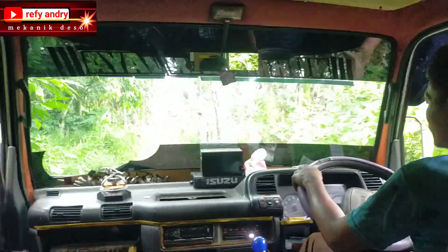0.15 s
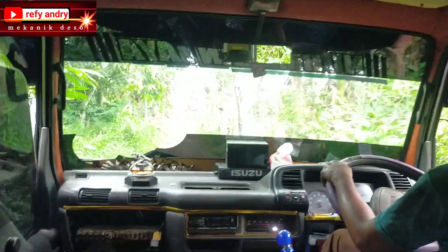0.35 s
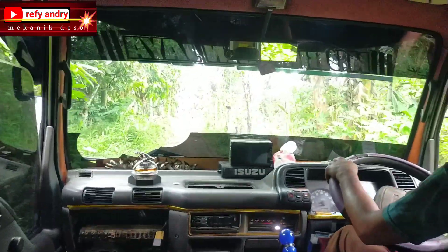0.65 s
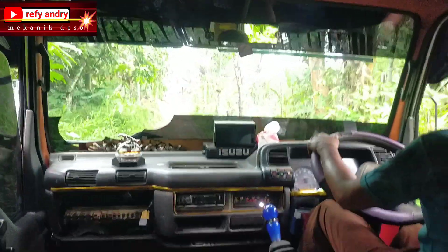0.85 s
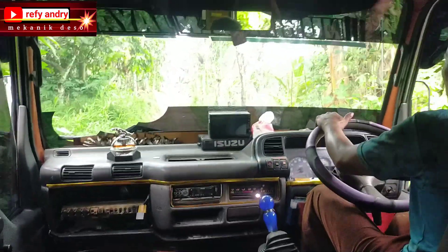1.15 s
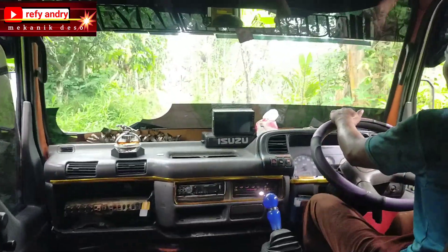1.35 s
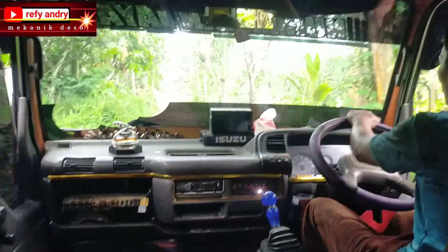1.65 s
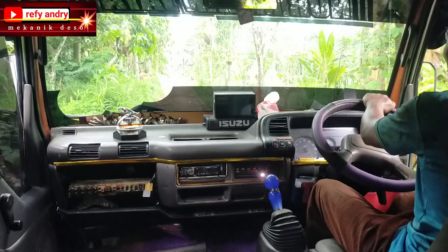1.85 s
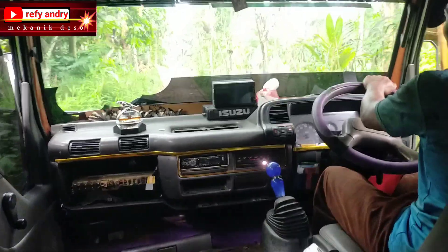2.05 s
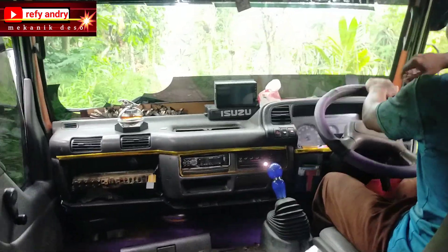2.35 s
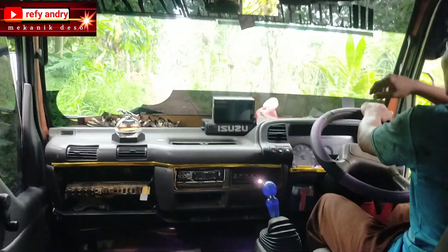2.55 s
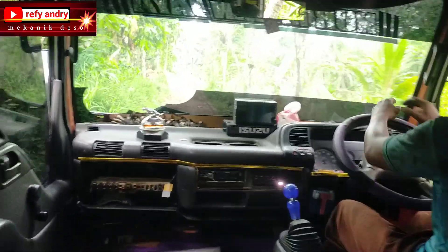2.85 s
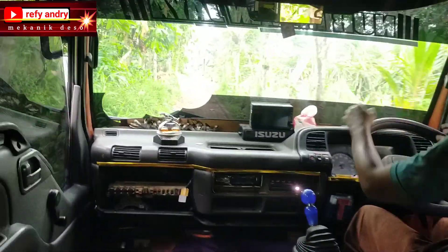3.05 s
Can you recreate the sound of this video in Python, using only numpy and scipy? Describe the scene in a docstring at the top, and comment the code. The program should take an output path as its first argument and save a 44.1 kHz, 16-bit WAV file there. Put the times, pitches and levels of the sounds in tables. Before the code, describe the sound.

Truck diesel engine pulls steadily harder inside the cab while a turbo whine climbs.

```python
"""Inside the cab of a truck, one microphone hears a four-cylinder turbo-diesel pull at low revs.
Each firing strikes the block and gates its clatter, filtered by resonances of block and cab, and
multiples of the firing rate boom in the cab. The turbocharger whines in four harmonics, modulated by
turbulent air, with a breathy band near the second. Coloured noise is the rush of the intake."""
import sys
import numpy as np
from scipy import signal
from scipy.io import wavfile
from scipy.ndimage import uniform_filter1d

SR = 44100
rng = np.random.default_rng(int(sys.argv[2]) if len(sys.argv) > 2 else 0)


def nominal_scale(level):
    """Amplitude ratio for a level in decibels (scalar or array-like)."""
    x = np.asarray(level, float) / 20
    return 10 ** x


def generate_wav(signal):
    """Clip the signal to [-1, 1] and save it as 16-bit WAV at the path in sys.argv[1]."""
    frames = np.transpose(np.atleast_2d(signal))
    scaled = np.clip(frames, -1, 1) * 32767
    pcm = np.round(scaled).astype(np.int16)
    wavfile.write(sys.argv[1], SR, pcm)


N = 141120  # samples


def unit(x):
    """Normalization: scale to an rms of 1."""
    return x / np.sqrt(np.mean(np.abs(x) ** 2) + 1e-20)


def curve(rows):
    """Linear interpolation: the columns of a time table, one value a sample."""
    s, *columns = np.transpose(rows)
    return [np.interp(np.arange(N) / SR, s, c) for c in columns]


def at(points, hz):
    """Spectral envelope: read a level on a log-frequency axis."""
    table_hz, table_db = np.transpose(points)
    return np.interp(np.log(hz), np.log(table_hz), table_db)


def wander(rate_hz):
    """Random modulation: noise through a double one-pole low-pass, run in, with an rms of 1."""
    r = np.exp(-2 * np.pi * rate_hz / SR)
    run_in = SR // 2
    noise = rng.standard_normal(N + run_in)
    return unit(signal.lfilter([1], [1, -2 * r, r * r], noise)[run_in:])


def bands(sources, low, count, per_octave):
    """Filter bank: yield centre and signal of each band; neighbours take different sources."""
    edges = low * 2 ** (np.arange(count + 1) / per_octave)
    for k in range(count):
        sos = signal.butter(2, edges[k:k + 2], "band", fs=SR, output="sos")
        yield np.sqrt(edges[k] * edges[k + 1]), signal.sosfilt(sos, sources[k % 2])


def lifted(x, hz, width_hz, db):
    """Resonance: a two-pole mode added to x raises its centre by db (a negative db cuts it)."""
    r = np.exp(-np.pi * width_hz / SR)
    zeros = np.array([1, 0, -1]) * (1 - r * r) / 2
    poles = [1, -2 * r * np.cos(2 * np.pi * hz / SR), r * r]
    return x + (nominal_scale(db) - 1) * signal.lfilter(zeros, poles, x)


# engine speed: (time [s], firing rate [1/s])
FIRING_RATE = [(0, 34.2), (.33, 36.9), (.46, 37.7), (.75, 36.4), (1.05, 37.4), (1.32, 37.1), (1.62, 39.3),
               (1.97, 38.5), (2.35, 40), (2.7, 41.2), (3.0, 42), (3.2, 42.5)]


def firing():
    """Periodicity: the firing rate, and its integral, the count of firings so far."""
    rate, = curve(FIRING_RATE)
    return rate, np.cumsum(rate) / SR


# strength of the knock of each cylinder in firing order: (level [dB])
CYLINDER_KNOCK = [0.13, -1.7, 0.75, -1.3]


def knock_train():
    """Impulsive excitation: one impulse a firing, uneven between cylinders and from stroke to stroke."""
    spread_db, jitter_s = 0.7, 0.000092  # standard deviations
    _, count = firing()
    fired = np.flatnonzero(np.diff(np.floor(count), prepend=-1))
    chance = rng.standard_normal((len(fired), 2))
    at_sample = np.clip(fired + chance[:, 0] * jitter_s * SR, 0, N - 1).astype(int)
    knocks = np.zeros(N)
    knocks[at_sample] = nominal_scale(np.resize(CYLINDER_KNOCK, len(fired)) + spread_db * chance[:, 1])
    return knocks


# broad colour of block and cab: (frequency [Hz], relative level [dB])
CLATTER_COLOUR = [(22, -19), (50, -17.5), (115, -16.5), (250, -13), (340, -7.5), (640, -9.5), (1200, -4.5),
                  (2020, -6), (2400, -12.5), (3150, -10), (6000, -15)]
# resonances of block and panels: (frequency [Hz], width [Hz], lift [dB])
BODY_MODES = [(350, 27, 1), (516, 33, 4), (567.4, 16.5, 6.5), (689, 17, 5.5), (763, 34, 5), (913, 74, 3),
              (1235, 67, 5.5), (1330, 33, -5.5), (1470, 34, 3.5), (1981, 43, 8), (2061, 26, 6.5),
              (2141, 25, 5), (2440, 67, 5.5), (2604, 20, 11.5)]
# load, as the level of the clatter: (time [s], rms level [dB])
LOAD_LEVEL = [(0.0, -30), (0.54, -28.5), (0.93, -30.5), (1.01, -28.5), (2.09, -28.5), (2.29, -28),
              (3.19, -27)]


def clatter():
    """Source and filter: knocks and gated noise excite the colour and resonances of block and cab."""
    knock_db = -2.5  # rms, against noise of rms 1
    gate_depth, gate_decay_s = 0.52, 0.0055
    gated_above_hz = 750  # lower down the cab smears the bursts into a rumble
    knocks = knock_train()
    r = np.exp(-1 / (gate_decay_s * SR))
    gate = unit(signal.lfilter([1], [1, -2 * r, r * r], knocks))

    noise = rng.standard_normal((2, N))
    bursts = noise * (1 - gate_depth + gate_depth * gate) - nominal_scale(knock_db) * unit(knocks)
    low_pass = signal.butter(2, gated_above_hz, fs=SR, output="sos")
    high_pass = signal.butter(2, gated_above_hz, "high", fs=SR, output="sos")
    rumble = signal.sosfilt(low_pass, noise)
    rattle = signal.sosfilt(high_pass, bursts)
    drive = rumble - rattle  # opposite signs avoid a notch at the crossover

    out = sum(nominal_scale(at(CLATTER_COLOUR, hz)) * band
              for hz, band in bands(drive, 20, count=21, per_octave=2.5))
    for hz, width_hz, db in BODY_MODES:
        out = lifted(out, hz, width_hz, db)
    load_db, = curve(LOAD_LEVEL)
    return nominal_scale(load_db) * unit(out)


# response of the cab to a multiple at its pitch, before waver and fade: (frequency [Hz], rms level [dB])
CAB_BOOM = [(34, -70), (36.5, -49), (42, -51), (68, -49), (75, -54.5), (79, -62), (84, -104), (138, -54.5),
            (150, -60.5), (168, -51.5), (185, -61), (210, -59.5), (250, -53), (295, -69), (340, -49.5),
            (380, -84), (480, -68), (508, -46), (545, -55.5), (585, -44.5), (605, -45), (625, -46.5),
            (660, -62), (695, -49), (725, -43)]
# multiples of the firing rate that are heard: (order)
ORDERS_HEARD = [1, 2, 4, 5, 6, 7, 9, 13, 15, 17]


def boom():
    """Engine orders: sines at multiples of the firing rate take the cab's response at their pitch."""
    waver_db, waver_hz = 2.5, 4
    hum_from_order, hum_full_rate, hum_db_per_rate = 13, 38.5, 4.0  # high orders fade below this rate
    hum_waver_db, hum_waver_hz = 1.8, 10  # and they come broken
    rate, count = firing()
    hum_fade_db = hum_db_per_rate * np.minimum(rate - hum_full_rate, 0)
    out = 0
    for k in ORDERS_HEARD:
        level_db = at(CAB_BOOM, k * rate) + waver_db * wander(waver_hz)
        if k >= hum_from_order:
            level_db = level_db + hum_fade_db + hum_waver_db * wander(hum_waver_hz)
        sine = np.sin(2 * np.pi * (k * count + rng.random()))
        out = out + np.sqrt(2) * nominal_scale(level_db) * sine
    return out


# pitch of the turbocharger whine: (time [s], frequency [Hz])
WHINE_PITCH = [(0.0, 3108), (0.2, 3162), (0.4, 3265), (0.5, 3318), (0.6, 3354), (0.8, 3385), (1.0, 3426),
               (1.2, 3464), (1.4, 3498), (1.6, 3575), (1.8, 3642), (2.0, 3672), (2.2, 3714), (2.4, 3787),
               (2.6, 3847), (2.8, 3926), (3.0, 4007), (3.2, 4102)]
# each harmonic swells and fades as it sweeps: (time [s], rms level before modulation [dB])
FIRST_SWELL = [(0.03, -23.5), (0.15, -22.5), (0.18, -36), (0.24, -27), (0.3, -35), (0.35, -28), (.42, -37),
               (0.46, -52), (0.65, -53), (0.7, -39), (0.8, -37), (0.87, -42), (0.92, -55), (1.0, -48),
               (1.04, -38), (1.13, -29.5), (1.19, -31), (1.21, -44), (1.23, -33.5), (1.33, -41), (1.5, -45),
               (1.63, -36), (1.72, -39), (1.77, -30), (1.83, -30), (1.86, -46), (1.93, -23), (1.97, -27),
               (2.04, -26), (2.2, -36), (2.29, -36), (2.32, -50), (2.5, -37), (2.55, -54), (2.78, -37),
               (2.96, -50), (3.0, -34), (3.08, -42)]
SECOND_SWELL = [(0.06, -36.5), (0.18, -28.5), (0.24, -27.5), (0.28, -42), (0.36, -30), (0.44, -42),
                (0.56, -37), (0.639, -37), (0.84, -51), (0.919, -31.5), (1.08, -47), (1.32, -38),
                (1.42, -36), (1.5, -51), (1.56, -31), (1.621, -39), (1.8, -43), (1.979, -33), (2.06, -34),
                (2.201, -20), (2.28, -19), (2.359, -19.5), (2.441, -30.5), (2.621, -24), (2.659, -24.5),
                (2.86, -15.5), (3.08, -20.5), (3.119, -30), (3.16, -26.5)]
THIRD_SWELL = [(1.18, -57), (1.36, -45), (1.52, -49), (1.68, -40), (1.82, -48), (2.05, -52), (2.3, -35),
               (2.5, -42), (2.6, -41), (2.7, -47), (2.98, -48), (3.08, -39), (3.16, -43)]
FOURTH_SWELL = [(0.06, -48), (0.36, -46), (0.62, -46), (0.76, -34), (0.92, -48), (1.02, -45), (1.1, -32),
                (1.22, -35), (1.32, -49), (1.4, -36), (1.52, -35), (1.58, -41), (1.62, -34), (1.7, -39),
                (1.76, -44), (1.86, -43), (2.05, -36), (2.12, -27), (2.24, -36), (2.32, -26), (2.38, -33),
                (2.42, -30), (2.5, -44), (2.56, -40), (2.8, -48)]
# turbulence on each harmonic, rms in each quadrature against the tone:
# (flutter share [1], flutter rate [Hz], fuzz level [dB], fuzz rate [Hz])
TURBULENCE = [(.14, 35, -18, 150), (.5, 50, -15, 200), (.6, 45, -11, 200), (.65, 60, -8, 300)]


def quadratures(rate_hz):
    """Complex modulation: independent wander in phase and in quadrature."""
    return wander(rate_hz) + 1j * wander(rate_hz)


def whine():
    """Harmonics and modulation: four tones on one shaft, with sidebands from firing and turbulence."""
    throb = 0.22  # share by which each firing pumps the whine
    wobble_hz, wobble_rate_hz = 3.06, 17.2
    halo_db, low_halo_db, halo_hz = -43.5, -41.5, 135  # rms; the low halo at full boost
    pitch, = curve(WHINE_PITCH)
    phase = 2 * np.pi * np.cumsum(pitch + wobble_hz * wander(wobble_rate_hz)) / SR
    _, count = firing()
    swells = [FIRST_SWELL, SECOND_SWELL, THIRD_SWELL, FOURTH_SWELL]
    out = 0
    for k, (swell, turbulence) in enumerate(zip(swells, TURBULENCE), 1):
        share, flutter_hz, fuzz_db, fuzz_hz = turbulence
        level_db, = curve(swell)
        pumping = throb * np.cos(2 * np.pi * count + k)
        flutter = share * quadratures(flutter_hz)
        fuzz = nominal_scale(fuzz_db) * quadratures(fuzz_hz)
        tone = np.real((1 + pumping + flutter + fuzz) * np.exp(1j * k * phase))
        out = out + np.sqrt(2) * nominal_scale(level_db) * tone

    # a steady blur of noise follows the second harmonic; the first gains its own as the boost builds
    halo = nominal_scale(halo_db) * np.real(quadratures(halo_hz) * np.exp(2j * phase))
    _, boost = curve(AIR_BOOST)
    low_halo = nominal_scale(low_halo_db) * boost * np.real(quadratures(halo_hz) * np.exp(1j * phase))
    return out + halo + low_halo


# breathy band near the second harmonic:
# (time [s], centre [Hz], rms level before flicker [dB], half width [Hz])
BREATHY_BAND = [(0, 5950, -33.5, 448), (.35, 6320, -31.5, 401), (.55, 6850, -39.5, 399),
                (.7, 7300, -33.5, 253.6), (.95, 7330, -35, 251.5), (1.2, 7310, -41, 396),
                (1.5, 7480, -40, 400), (1.75, 7900, -40, 401), (1.92, 8300, -33.5, 246),
                (2.1, 8530, -37, 298.5), (2.3, 7920, -26, 491), (2.47, 7790, -28, 501),
                (2.65, 8000, -26, 504.5), (2.87, 8010, -20, 500), (3.05, 8250, -37, 502),
                (3.2, 8370, -25.5, 505)]


def rush():
    """Heterodyning: low-passed noise shifted to a drifting centre; reading it faster widens the band."""
    noise_hz, flicker_db, flicker_hz = 200, 2, 28.0  # noise_hz: half width at normal reading speed
    centre, level_db, half_width = curve(BREATHY_BAND)
    low_pass = signal.butter(3, noise_hz, fs=SR, output="sos")
    noise = signal.sosfilt(low_pass, rng.standard_normal((2, 3 * N)))
    place = np.cumsum(half_width / noise_hz)
    real, imag = [unit(np.interp(place, np.arange(3 * N), row)) for row in noise]
    carrier = np.exp(2j * np.pi * np.cumsum(centre) / SR)
    band = np.real((real + 1j * imag) * carrier)
    return nominal_scale(level_db + flicker_db * wander(flicker_hz)) * band


# colour of the intake air early and late in the pull: (frequency [Hz], relative level [dB])
EARLY_COLOUR = [(2750, -7.5), (3075, -22.5), (3440, 0), (3850, -3), (4800, -3.5), (5380, -2.5), (6720, 3),
                (7520, 0.5), (10500, -10.5), (11760, -3.5), (14700, -1.5), (16450, -40)]
LATE_COLOUR = [(2750, -1.5), (3075, 3), (3440, -12), (3850, -5.3), (4300, -3), (4800, -6), (6720, 0.8),
               (7520, -0.5), (8400, 2.5), (9400, -7.5), (11760, -5), (14700, -0.4), (16450, -45)]
# resonances of the intake duct: (frequency [Hz], width [Hz], lift [dB])
DUCT_MODES = [(4540, 140, 4), (4780, 72, 5), (5590, 83, 2)]
# boost: (time [s], rms level of the air [dB], colour from 0 early to 1 late [1])
AIR_BOOST = [(0, -31, 0.01), (.5, -30, .02), (.8, -29, 0.052), (1.1, -29.5, .15), (1.7, -28, 0.29),
             (2.0, -26.5, 0.33), (2.5, -26.5, 0.73), (3.2, -25.5, 1)]


def intake():
    """Flow noise: turbulent air filtered by the duct, its colour and level moving with the boost."""
    patchy_db, patchy_hz = 1.18, 15.6
    throb = 0.12  # share by which each intake stroke pumps the air
    air_db, late = curve(AIR_BOOST)
    white = rng.standard_normal((2, N))
    out = 0
    for hz, band in bands(white, 2600, count=17, per_octave=6.2):
        colour_db = (1 - late) * at(EARLY_COLOUR, hz) + late * at(LATE_COLOUR, hz)
        out = out + nominal_scale(colour_db + patchy_db * wander(patchy_hz)) * band
    for hz, width_hz, db in DUCT_MODES:
        out = lifted(out, hz, width_hz, db)
    running_rms = np.sqrt(uniform_filter1d(out ** 2, size=SR // 2))
    _, count = firing()
    gulps = 1 + throb * np.cos(2 * np.pi * count)
    return nominal_scale(air_db) * gulps * out / running_rms


def scene():
    """Superposition: the sources add at one microphone, which feeds both channels."""
    return np.tile(clatter() + boom() + whine() + rush() + intake(), (2, 1))


def top_cut(x):
    """Nothing passes above the cut-off."""
    return signal.sosfilt(signal.butter(12, 16410, fs=SR, output="sos"), x)


def record(dry):
    """Band limiting: a steep elliptic low-pass cuts the top of the spectrum."""
    cutoff_hz, ripple_db, stop_db = 15720, 0.3, 70
    low_pass = signal.ellip(14, ripple_db, stop_db, cutoff_hz, fs=SR, output="sos")
    mix = signal.sosfilt(low_pass, dry)
    return top_cut(mix)


dry = scene()
out = record(dry)
generate_wav(out)
```